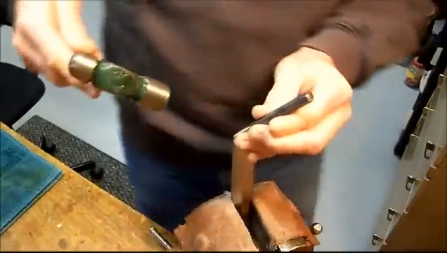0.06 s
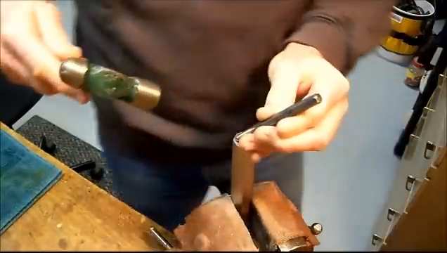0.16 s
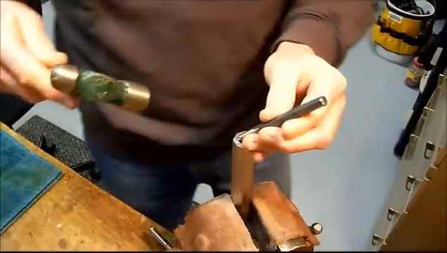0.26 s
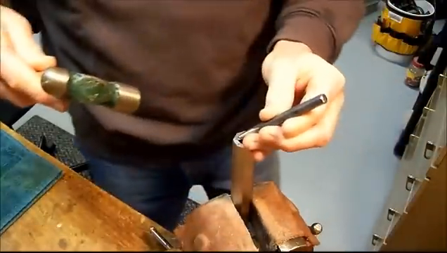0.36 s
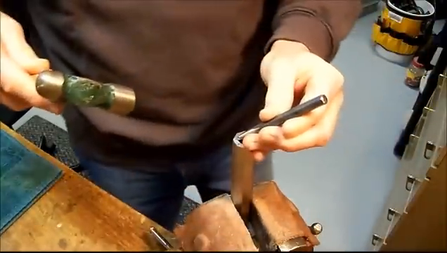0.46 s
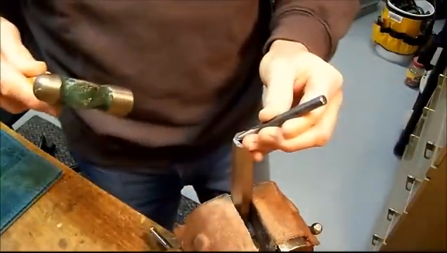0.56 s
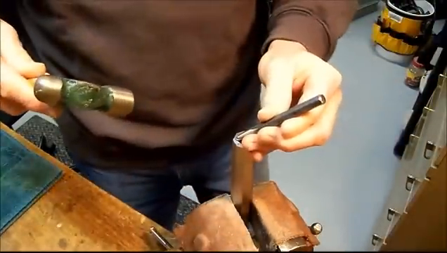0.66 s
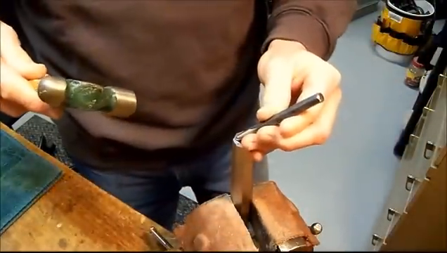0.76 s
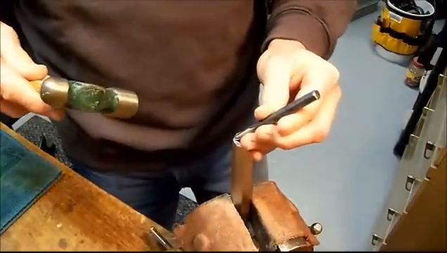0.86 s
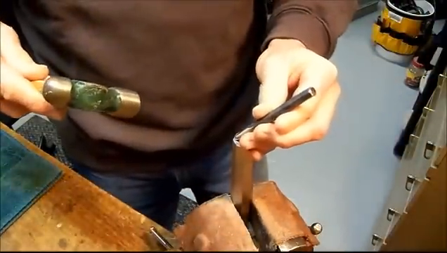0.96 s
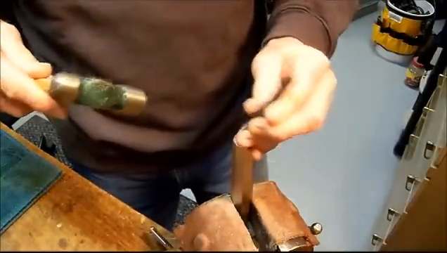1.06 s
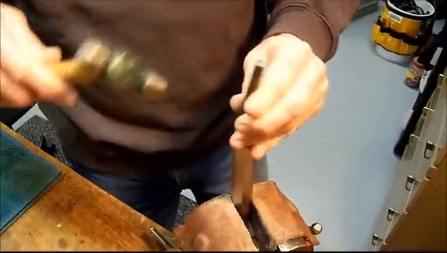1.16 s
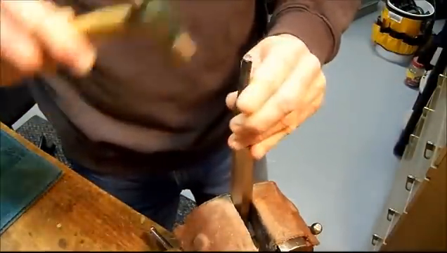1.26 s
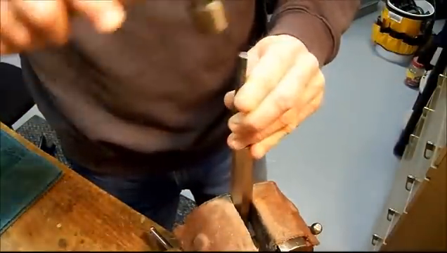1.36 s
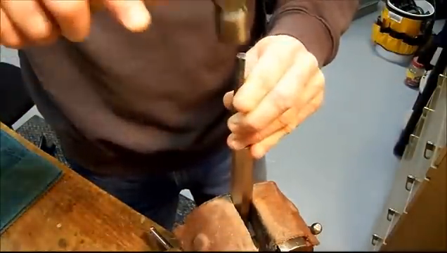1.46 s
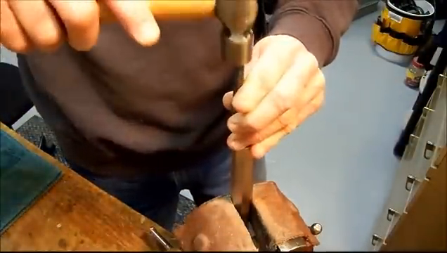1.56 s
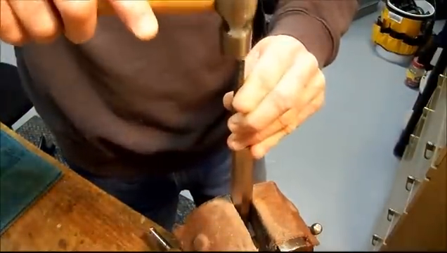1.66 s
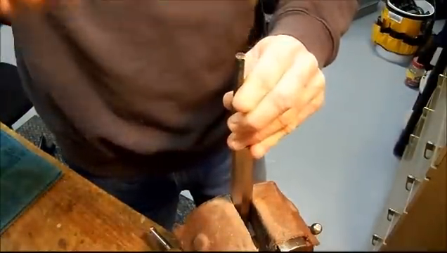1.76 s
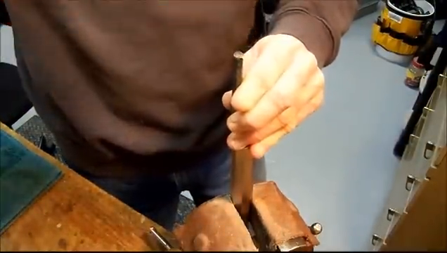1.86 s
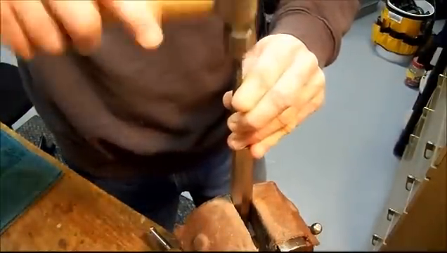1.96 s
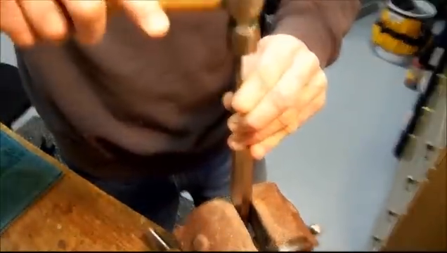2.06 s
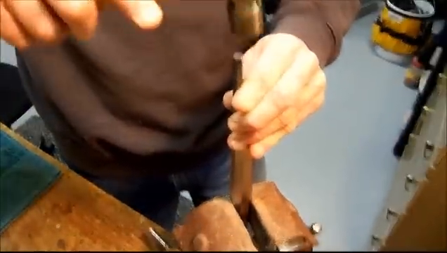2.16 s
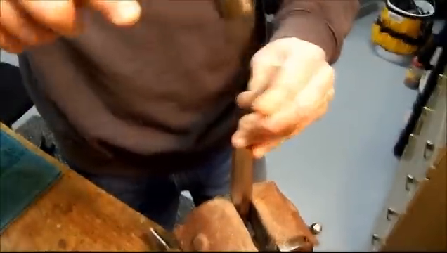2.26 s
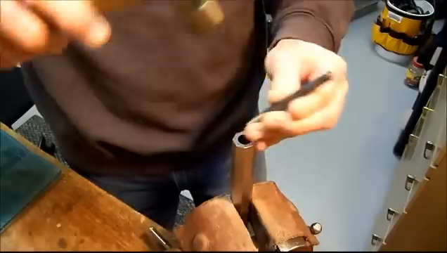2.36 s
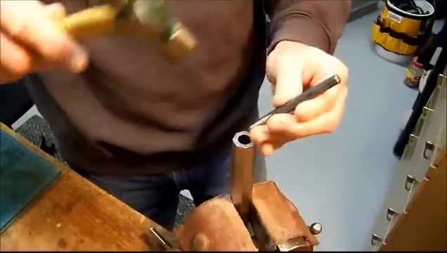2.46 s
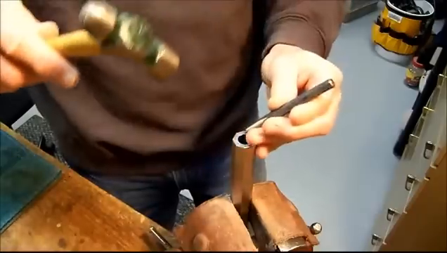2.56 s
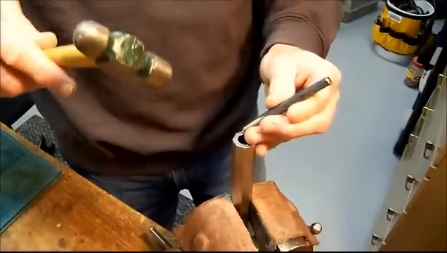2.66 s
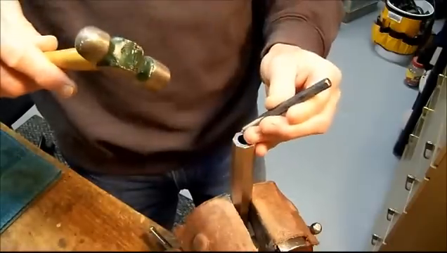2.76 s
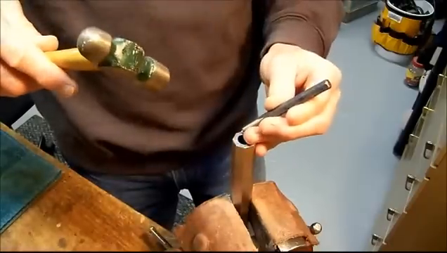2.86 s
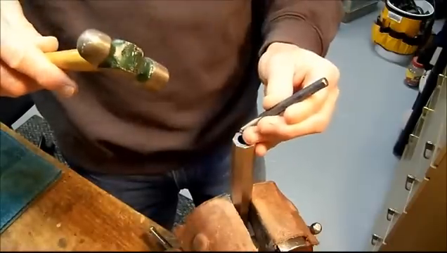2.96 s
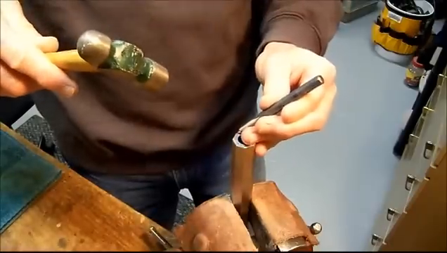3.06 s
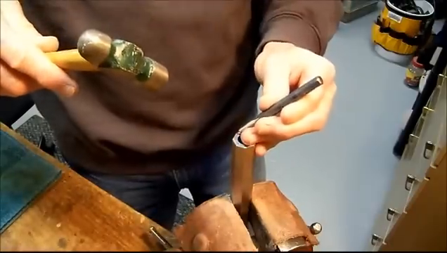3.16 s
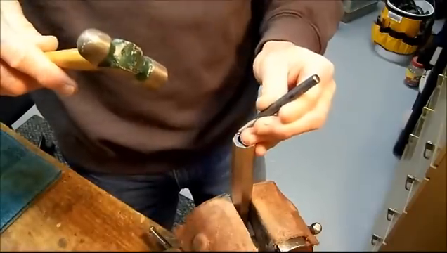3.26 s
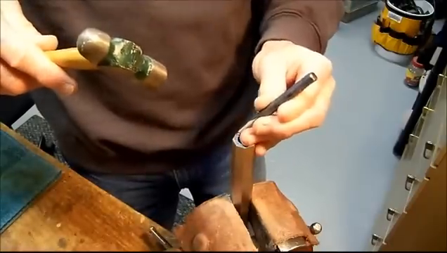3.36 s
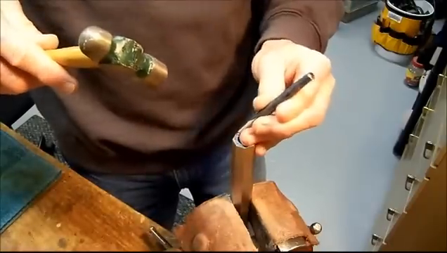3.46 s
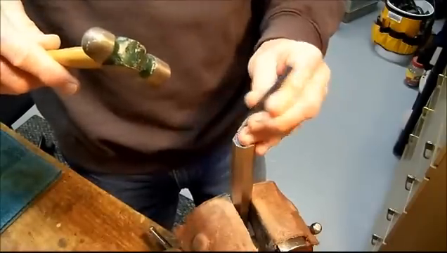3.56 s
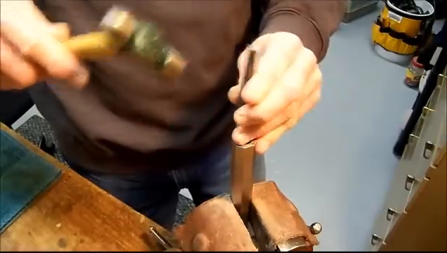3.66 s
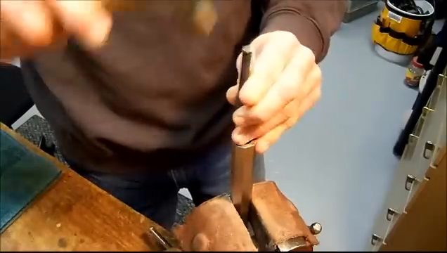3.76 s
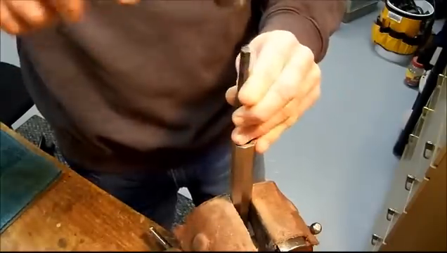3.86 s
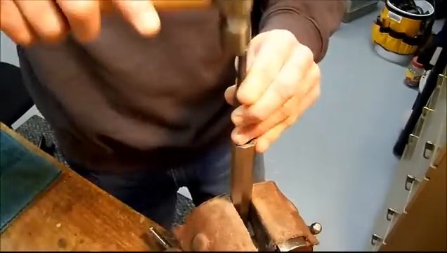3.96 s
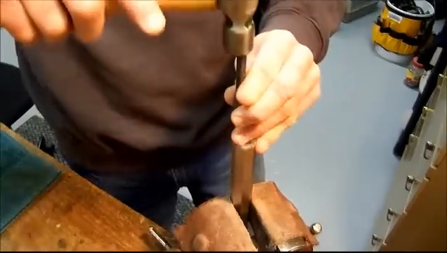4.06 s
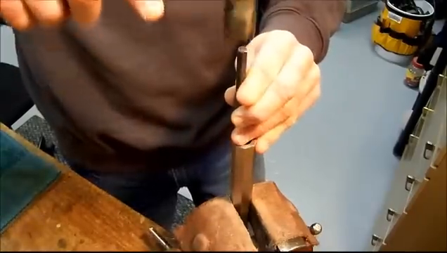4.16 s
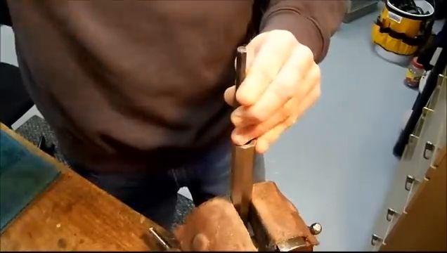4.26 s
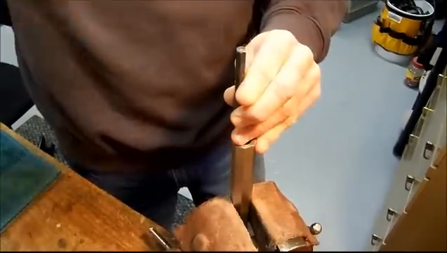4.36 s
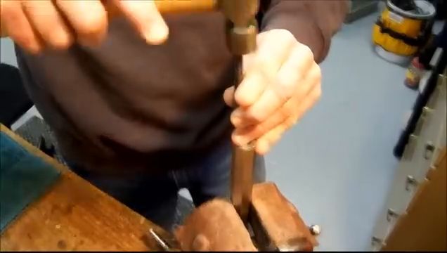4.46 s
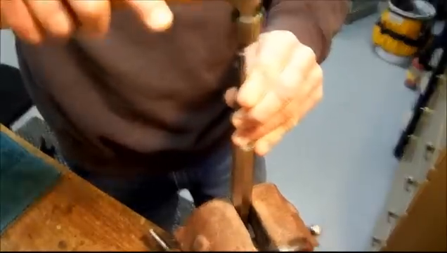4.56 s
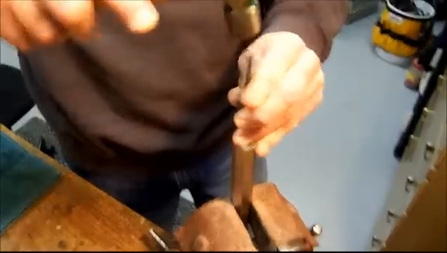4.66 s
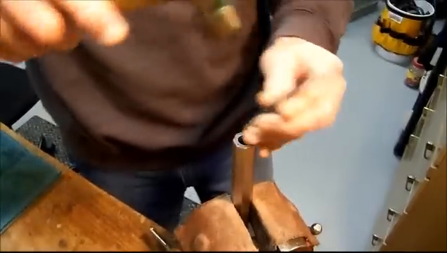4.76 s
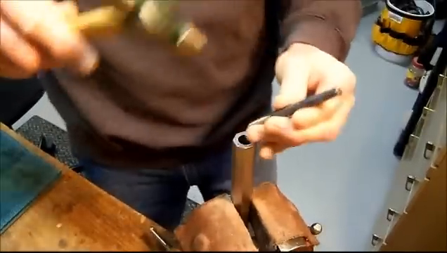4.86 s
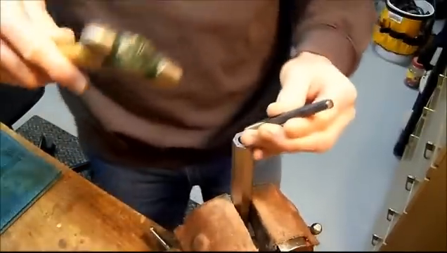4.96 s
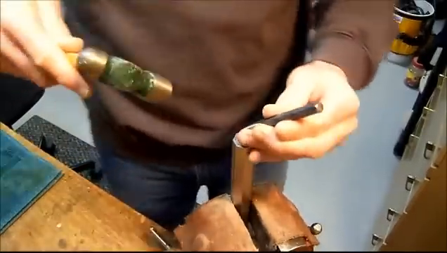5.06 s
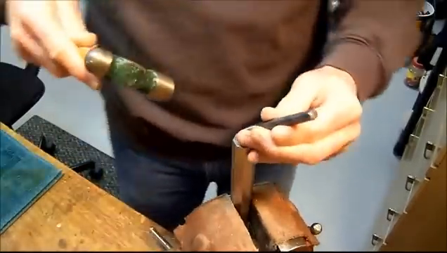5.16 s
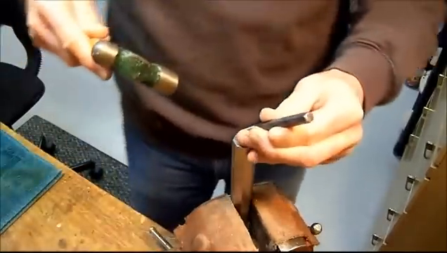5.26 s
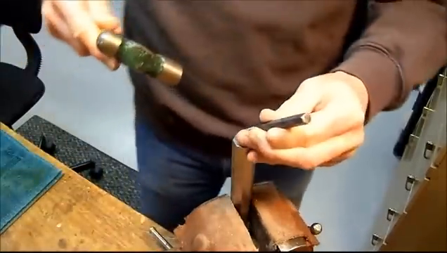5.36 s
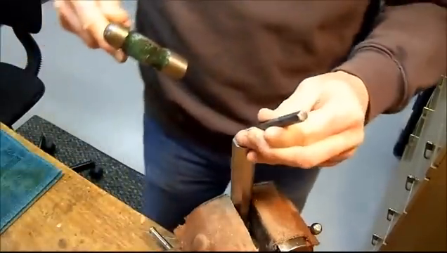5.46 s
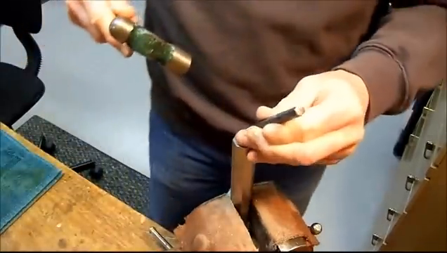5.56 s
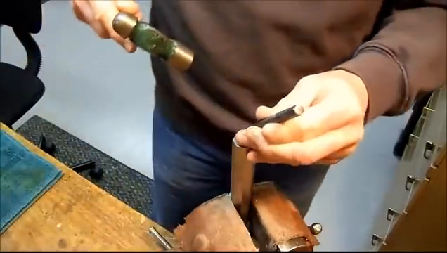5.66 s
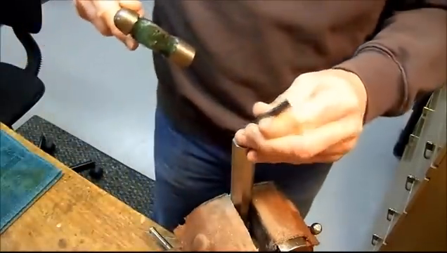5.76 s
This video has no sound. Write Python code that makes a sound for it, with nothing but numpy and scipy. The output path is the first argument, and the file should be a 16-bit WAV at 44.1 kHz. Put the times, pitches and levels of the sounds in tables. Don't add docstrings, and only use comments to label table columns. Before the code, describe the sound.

In a quiet workshop, a hammer taps a steel punch lightly, then strikes hard with a clanging rattle; the tap-and-blow pair repeats.

```python
import sys
import numpy as np
from scipy import signal
from scipy.io import wavfile
from scipy.ndimage import uniform_filter1d

SR = 44100
rng = np.random.default_rng(int(sys.argv[2]) if len(sys.argv) > 2 else 0)


def convert_level_to_amplitude(level_db):
    exponent = np.asarray(level_db, float) / 20
    return 10 ** exponent


def dump_mix(stems):
    frames = np.atleast_2d(stems).T
    limited = np.clip(frames, -1, 1)
    pcm = np.round(limited * 32767).astype(np.int16)
    wavfile.write(sys.argv[1], SR, pcm)


N = 256220

# [t/s, clatter level/dB, crack level/dB, bench level/dB]
TAPS = [
    (1.63, -30.5, -18.5, -42),
    (4.0483, -26.5, -12, -38),
    (4.1274, -41.5, -39.5, -48),
]
# [t/s, clatter level/dB, crack level/dB, bench level/dB]
BLOWS = [
    (2.0359, -9.5, -6, -16.5),
    (4.5167, -13, -5.5, -18),
]
# [rms level/dB, t60/s, first turn t/s, second turn t/s, second turn depth/dB]
HEAD_RINGS = [
    (-30, 1.07, .055, .212, 19.075),
    (-30, 0.84, .066, 0.26263, 7.006),
]
VICE_HZ = [231, 500, 620, 662, 684, 776, 883, 1000, 1028, 1281, 1410, 1906, 1981, 2682, 2730, 2797, 2875,
           2995, 3628, 4500, 4865]
PUNCH_HZ = [5445, 5760, 5900, 6420, 6550, 6743, 6831, 6887, 7779, 8050, 8470, 8807, 9270, 9690, 10520,
            11020, 11435, 11590, 12230, 12970, 13256, 13900]
# [t60/s, level/dB in each of the three taps]
TAP_VICE = [(0.42, -35.5, -38.5, -45.5), (0.1611, -32.5, -28, -40.5), (.25, -34, -48, -46),
            (0.15552, -19, -22, -34), (0.063, -28.5, -16, -24), (0.18, -22, -26, -37),
            (0.12, -22.5, -23, -32), (0.11, -31, -22, -34.5), (0.21, -28.5, -43, -39.5),
            (0.18506, -44, -35, -48), (0.26, -48, -46, -58.5), (0.17, -48.5, -45, -58),
            (0.11, -41, -34, -64), (0.23, -57, -54, -54), (0.2, -43, -33, -50), (0.196, -47.5, -37.5, -52),
            (0.065, -41, -20.5, -34), (0.22, -41, -36, -48), (0.046, -34, -47.5, -68),
            (0.02, -42.5, -14, -58), (0.12, -53, -38.5, -64.5)]
# [t60/s, level/dB in each of the three taps]
TAP_PUNCH = [(0.159, -37, -48.5, -70), (0.21, -41, -45.5, -51.5), (0.026, -15.5, -33.5, -34),
             (.18, -46, -50, -71), (0.02, -14.5, -33, -52.5), (0.2149, -45.5, -50, -58),
             (0.043, -25, -45, -60), (.15, -47, -50, -69), (0.15, -28, -30, -62),
             (0.088, -26.5, -22.5, -47), (.31, -56.5, -34.5, -59), (0.12, -51, -33, -66),
             (0.0771, -34.5, -49, -70), (0.12, -39.5, -51, -75), (0.13, -48, -45, -79), (.1, -75, -72, -78),
             (0.22, -36, -42.5, -79.5), (0.19, -63, -56.5, -76), (.05, -49.5, -55, -78),
             (0.17259, -21.5, -31.5, -70), (0.25, -47.5, -45, -65.5), (.04, -35, -37.5, -78)]
# [t60/s, level/dB in each of the two blows]
BLOW_VICE = [(.3, -33, -37.5), (.17, -18, -21), (0.21, -19, -20.5), (0.045, -12.5, -12.5),
             (.14, -0.5, -1.5), (0.1, -5.5, -10.5), (0.18, -30, -27), (0.12, -4, -5.5), (0.12, -19, -19),
             (0.13, -15, -15.5), (0.2, -26.5, -36.5), (.18, -21.5, -27.5), (0.13, -33, -36.5),
             (.32, -27, -31), (0.17, -12, -12.5), (0.26, -15, -17.5), (.2, -12, -15.5), (0.15, -22.5, -29),
             (0.053, -30, -29), (0.23, -30, -29.5), (.2, -33, -29.5)]
# [t60/s, level/dB in each of the two blows]
BLOW_PUNCH = [(0.2005, -32.5, -35), (0.18, -18, -20), (.1, -28.5, -29), (.15, -29.5, -33),
              (0.074, -25.5, -27.5), (0.2, -18, -17.5), (.15, -17, -23), (.15, -22.5, -27.5),
              (0.2, -18, -24.5), (0.14, -23.5, -23), (0.35, -40.5, -30.5), (0.17, -26, -26.5),
              (.12, -27.5, -32), (.16, -30.5, -27), (0.14, -21.5, -20), (0.18, -27, -27), (0.22, -36, -34),
              (.13, -23.5, -26), (.08, -25, -30.5), (.14, -28.5, -27), (0.15, -13.5, -15),
              (0.057, -18, -30.5)]
# [f/Hz, level/dB, t60/s, build-up/s]
BENCH = [(29.65, -8.5, .9, 0.012), (57.08, -2.5, .35, 0.0035), (121.82, -9, .7, 0.044),
         (200, -13.5, .2, .05), (169, -4.5, 0.073, 0.0052), (190, -1.5, 0.051, 0.0022),
         (237.3, -7, 0.14, .008), (334.2, -7.5, 0.16, .006), (450, -6, .2, 0.0066)]
# [f/Hz, level per Hz/dB]
TAP_CLATTER = [(88, -45.5), (150, -16.5), (687, -5.5), (2360, -22), (2920, -17), (4370, -23), (7940, -16),
               (12100, -33.5), (13400, -10), (15000, -77)]
# [f/Hz, level per Hz/dB]
BLOW_CLATTER = [(88, -50), (150, -14), (545, -12), (687, -5), (2270, -15), (2810, -5.5), (3890, -18),
                (11000, -11.5), (13600, -19), (15000, -53)]
# [f/Hz, t60/s]
CLATTER_T60 = [(150, 0.51), (600, 0.17), (2000, 0.2), (4000, 0.15), (7000, .18), (14000, 0.16)]
# [stroke t/s, first tick delay/s, first gap/s, knock level/dB, click level/dB]
BLOW_SWAYS = [
    (2.0361, .046, .0335, -24, -20),
    (4.5171, .048, .0335, -26, -22),
]
# [stroke t/s, first tick delay/s, first gap/s, knock level/dB, click level/dB]
TAP_SWAYS = [
    (1.6299, .0605, .032, -33, -52),
    (4.1271, .0645, .0292, -48, -68),
]
# [t/s, knock peak level/dB, click level/dB]
STRAYS = [(2.159, -29, -54), (2.174, -34, -58), (2.191, -38, -54), (2.196, -35, -64), (2.231, -38.5, -66),
          (4.586, -40, -30.5), (4.62, -30, -46), (4.641, -37, -62), (4.657, -38.5, -58), (4.677, -41, -60),
          (4.712, -41.5, -63), (4.745, -43, -69), (4.776, -46, -73)]
# [f/Hz, level/dB, t60/s]
RETOUCHED = [(2730, -8, .2), (2875, -8, .2), (5760, -18, .08), (8050, -16, .08)]
# [t/s, peak level/dB, centre f/Hz]
SCRAPES = [(0.2943, -62, 11400), (0.3171, -50, 11560), (0.561, -61, 11500), (1.0708, -48, 7600),
           (1.1437, -49, 7778), (1.1534, -52, 7000), (3.3777, -57, 11300)]
# [t/s, peak level/dB]
NUDGES = [(0.329, -49.5), (0.449, -60), (0.923, -48), (1.209, -58), (3.409, -48), (4.395, -51.5),
          (5.289, -62.5), (5.679, -55.5)]
# [f/Hz, level/dB, t60/s]
TUBE = [(663, 2, 0.059), (934.31, 2.5, 0.032), (1310, -4.5, 0.036), (1963, -7.5, 0.03499),
        (2700, -11, 0.01582), (3932.5, -22, 0.011)]
# [t/s, rms level/dB, half length/s]
RUSTLES = [(0.304, -68, 0.078), (.44, -66, 0.058), (1.207, -68.5, 0.07092), (1.921, -68, .04),
           (4.402, -68.5, 0.03645), (5.29, -72, 0.046)]
# [f/Hz, level per Hz/dB]
ROOM_TONE = [(12, -28.5), (20, 0.5), (64, -0.5), (179, -4.5), (230, -7), (295, -8.5), (590, -16),
             (697, -17.5), (1740, -26.5), (7170, -34.5), (12500, -35), (14000, -33.5), (15200, -66.5)]
# [low f/Hz, high f/Hz, start after blow/s, end after blow/s]
STARVED = [(9700, 10450, .15, .4), (10900, 11800, .15, .55), (11800, 12800, .08, .6),
           (12800, 13600, .14, .6), (13600, 15000, .07, .6)]


def hammer():
    out = sum(head_ring(blow[0], *row) for blow, row in zip(BLOWS, HEAD_RINGS))
    for k, (row, dull_hz) in enumerate(zip(TAPS, [11000, 10000, 8000])):
        vice, punch = struck(VICE_HZ, TAP_VICE, k), struck(PUNCH_HZ, TAP_PUNCH, k)
        out += stroke(row, vice, punch, TAP_CLATTER, dull_hz, swell_cycles=2.75)
    for k, row in enumerate(BLOWS):
        vice, punch = struck(VICE_HZ, BLOW_VICE, k), struck(PUNCH_HZ, BLOW_PUNCH, k)
        out += stroke(row, vice, punch, BLOW_CLATTER, dull_hz=13800, swell_cycles=12.0, seat_db=9.0)
    return out


def struck(modes_hz, table, k):
    return [(hz, row[1 + k], row[0]) for hz, row in zip(modes_hz, table)]


def stroke(row, vice, punch, clatter, dull_hz, swell_cycles, seat_db=0):
    s, clatter_db, crack_db, bench_db = row
    graze_s, graze_db, crack_t60_s = .003, -24, 0.019
    noise = banded_noise(clatter, round(.5 * SR), low_hz=119.16, t60s=CLATTER_T60)
    t = np.arange(len(noise)) / SR
    noise = noise / np.std(noise[:441]) * (1 - np.exp(-t / .0005))
    crack = filtered(noise, "high", 2400, order=1) * convert_level_to_amplitude(crack_db - 60 * t / crack_t60_s)
    out = np.zeros(N)
    add(out, s - graze_s, convert_level_to_amplitude(clatter_db + graze_db) * noise[:round(graze_s * SR)])
    add(out, s, clank(vice, swell_cycles, seat_db) + ring(punch, .45, rise_s=0.00024))
    add(out, s, filtered(convert_level_to_amplitude(clatter_db) * noise + crack, "low", dull_hz, order=4))
    for hz, db, t60, build_s in BENCH:
        add(out, s + build_s, ring([(hz, bench_db + db, t60)], 0.95, build_s, cycles=.1))
    return out


def clank(vice, swell_cycles, seat_db):
    split_hz, seat_s, fall_s = 1100, .038, .004
    low = ring([mode for mode in vice if mode[0] < split_hz], .45, .0003, swell_cycles)
    high = ring([mode for mode in vice if mode[0] >= split_hz], .45, .0003, swell_cycles)
    t = np.arange(len(low)) / SR
    seated = 1 / (1 + np.exp((seat_s - t) / fall_s))
    return low * convert_level_to_amplitude(seat_db * (0.1756 - seated)) + high


def head_ring(s, db, t60, first_s, second_s, second_db):
    rest_hz, rebound_m_per_s, rebound_s = 10640, .8, .06
    rise_s, early_db, early_s = 0.0068, 11, .035
    t = np.maximum(np.arange(N) / SR - s, 0)
    speed = rebound_m_per_s * t / rebound_s * np.exp(1 - t / rebound_s)
    phase = 2 * np.pi * np.cumsum(rest_hz * (1 + speed / 343)) / SR
    first_dip_db = 8.0 * np.exp(-((t - first_s) / 0.014) ** 2)
    second_dip_db = second_db * np.exp(-((t - second_s) / 0.046) ** 2)
    level_db = db - 60 * t / t60 + early_db * np.exp(-t / early_s) - first_dip_db - second_dip_db
    rise = 1 - np.exp(-(t / rise_s) ** 2)
    return np.sqrt(2) * convert_level_to_amplitude(level_db) * rise * np.sin(phase)


def handle():
    ticks = sways(BLOW_SWAYS, quicker_s=.00068, count=9) + sways(TAP_SWAYS, quicker_s=.002, count=4)
    s, knock_db, click_db = np.vstack(ticks + [STRAYS]).T
    s = s + .0008
    knocks = clicks(s, knock_db - 0.6, np.full(len(s), 1050), octaves=0.65, decay_s=.002, snap=9)
    click_hz = 4000 * convert_level_to_amplitude(rng.normal(0, .8, len(s)))
    bright = clicks(s, click_db + 10.0, click_hz, octaves=0.4, decay_s=0.00093, snap=6.1)
    out = filtered(knocks, "low", 2100, order=3) + filtered(bright, "low", 9500)
    for at, db in zip(s, click_db):
        add(out, at, convert_level_to_amplitude(db - 14) * ring(RETOUCHED, .15, rise_s=.0003))
    return out


def sways(rows, quicker_s, count):
    metal_sways = 4
    k = np.arange(count)
    soft = np.maximum(k - metal_sways + 1, 0)
    click_loss_db = 6 * (k - soft) + 11.5 * (soft > 0) + 4 * soft
    last_loss_db = 11.5 * (k == count - 1)
    ticks = []
    for s, first, gap, knock_db, click_db in rows:
        times = s + first + gap * k - quicker_s * k * (k - 1) / 2
        hold_db = min(-46, knock_db - 1.5) + 1.14 * k
        knocks_db = np.maximum(knock_db - 3 * k, hold_db) - last_loss_db
        ticks.append(np.transpose([times, knocks_db, click_db - click_loss_db]))
    return ticks


def scrapes():
    s, db, hz = np.transpose(SCRAPES)
    high = hz > 10000
    out = clicks(s[~high], db[~high], hz[~high], octaves=0.1889, decay_s=0.0038, snap=0)
    return out + clicks(s[high], db[high], hz[high], octaves=0.0369, decay_s=0.0043, snap=0)


def nudges():
    out, rub = np.zeros(N), np.hanning(round(0.057 * SR))
    for (s, db), white in zip(NUDGES, rng.standard_normal((len(NUDGES), len(rub)))):
        tube = ring(TUBE, .1, rise_s=0.000344, cycles=0.2556)
        hum = signal.fftconvolve(tube, white * rub)
        add(out, s - .022, convert_level_to_amplitude(db - 0.5) * hum / np.max(np.abs(hum)))
    return out


def sleeve():
    s, db, half = np.array(RUSTLES).T[:, :, None]
    swell = np.sum(convert_level_to_amplitude(db) * np.exp(-2 * ((np.arange(N) / SR - s) / half) ** 2), axis=0)
    grain = rng.standard_normal(N) * rng.exponential(1, N)
    grain = filtered(grain, "band", [800, 3800])
    return swell * grain / np.std(grain)


def room_tone():
    level_db, rumble_db = -69, 1
    step_db, fall_s, drift_db_per_s, rumble_spared = 3, 0.22, 0.0505, .4
    since = np.maximum(np.arange(N) / SR - np.array(BLOWS)[:, :1], 0)
    fall_db = step_db * (1 - np.exp(-(since / fall_s) ** 2))
    down_db = np.sum(fall_db + drift_db_per_s * since, axis=0)
    tone = banded_noise(ROOM_TONE, N + SR, low_hz=17.3)[SR:]
    tone = filtered(tone, "low", 14100, order=16)
    tone = tone / np.std(filtered(tone, "band", [1500, 6000], order=4))
    rumble = filtered(tone, "low", 300)
    rumble_lift = convert_level_to_amplitude(rumble_db + rumble_spared * down_db) - 1
    return convert_level_to_amplitude(level_db - down_db) * (tone + rumble_lift * rumble)


def ring(modes, seconds, rise_s, cycles=1.6):
    flutter_db, wander_rad, waver_hz = 3.0, .7, 40
    t = np.arange(round(seconds * SR)) / SR
    hz, db, t60 = np.array(modes, float).T[:, :, None]
    build = 1 - np.exp(-t / (rise_s + cycles / hz))

    def waver():
        knots = rng.standard_normal((len(hz), 64))
        curves = [np.interp(waver_hz * t, np.arange(64), row) for row in knots]
        return np.array(curves) * np.minimum(hz / 600, 1)

    level = convert_level_to_amplitude(db - 60 * t / t60 + flutter_db * waver())
    return np.sum(level * build * np.sin(2 * np.pi * hz * t + wander_rad * waver()), axis=0)


def clicks(times, levels_db, centres_hz, octaves, decay_s, snap):
    out, t = np.zeros(N), np.arange(round(.04 * SR)) / SR
    for s, db, hz, white in zip(times, levels_db, centres_hz, rng.standard_normal((len(times), len(t)))):
        burst = white * np.exp(-t / decay_s) + snap * (t == 0)
        burst = filtered(burst, "band", hz * 2 ** np.array([-octaves, octaves]))
        add(out, s, convert_level_to_amplitude(db) * burst / np.max(np.abs(burst)))
    return out


def banded_noise(spectrum, count, low_hz, t60s=None):
    white, t = rng.standard_normal((2, count)), np.arange(count) / SR
    edges = low_hz * 2 ** np.arange(0, np.log2(17000 / low_hz), 1 / 3)
    out = np.zeros(count)
    for k, (low, high) in enumerate(zip(edges, edges[1:])):
        hz = np.sqrt(low * high)
        decay_db = 0 if t60s is None else -60 * t / at_hz(t60s, hz)
        band = filtered(white[k % 2], "band", [low, high])
        out += convert_level_to_amplitude(at_hz(spectrum, hz) + decay_db) * band
    return out


def filtered(x, kind, hz, order=2):
    return signal.sosfilt(signal.butter(order, np.clip(hz, 10, .47 * SR), kind, fs=SR, output="sos"), x)


def at_hz(points, hz):
    table_hz, values = np.transpose(points)
    return np.interp(np.log(hz), np.log(table_hz), values)


def add(track, s, sound):
    at = round(s * SR)
    track[at:at + len(sound)] += sound[:N - at]


def scene():
    return (hammer() + handle() + scrapes() + nudges() + sleeve() + room_tone())[None]


def low_pass(x):
    return signal.sosfilt(signal.butter(12, 15320, fs=SR, output="sos"), x)


def record(dry):
    overload, lapse_s, lapse_share = .45, .023, .1
    kept = overload * dry / (overload ** 6 + dry ** 6) ** (1 / 6)
    t = np.arange(N) / SR
    for low, high, start, end in STARVED:
        starved = sum((t > row[0] + start) & (t < row[0] + end) for row in BLOWS)
        starved = starved * (rng.random(300)[(t / lapse_s).astype(int)] > lapse_share)
        sos = signal.cheby1(6, .01, [low, high], "band", fs=SR, output="sos")
        band = signal.sosfiltfilt(sos, kept)
        kept = kept - uniform_filter1d(starved * 1., size=900) * band
    mix = np.clip(filtered(kept, "low", 14200, order=16), -.6, .6)
    return low_pass(mix)


dry = scene()
out = record(dry)
dump_mix(out)
```